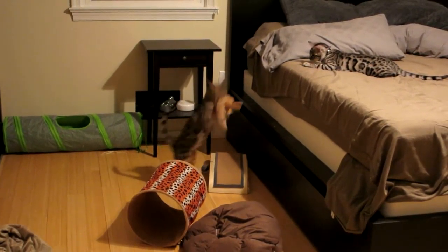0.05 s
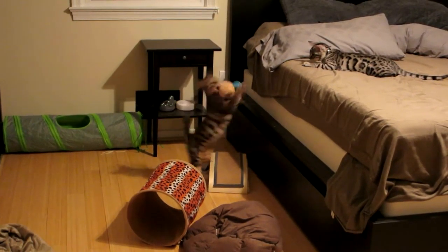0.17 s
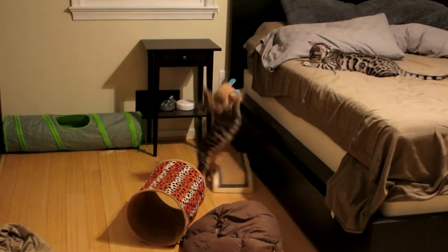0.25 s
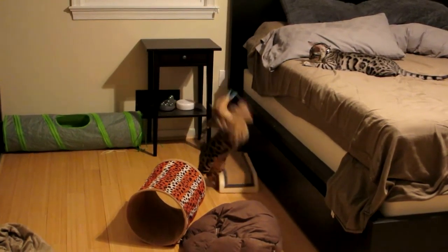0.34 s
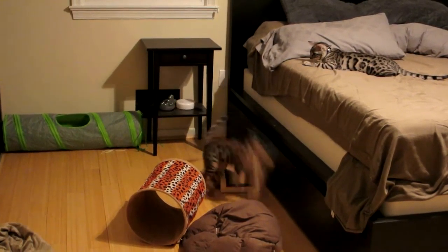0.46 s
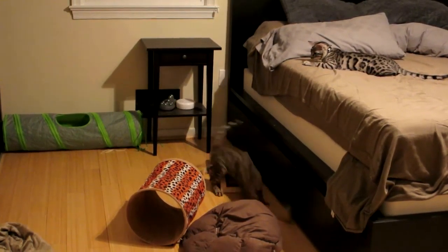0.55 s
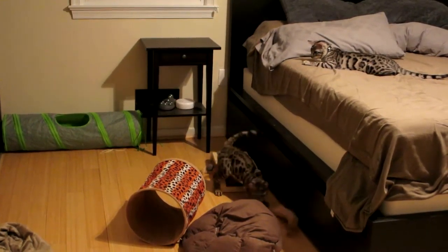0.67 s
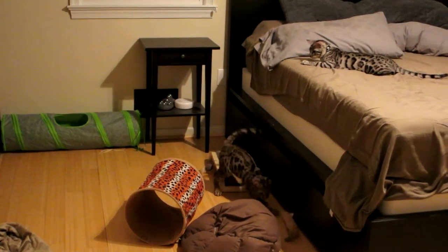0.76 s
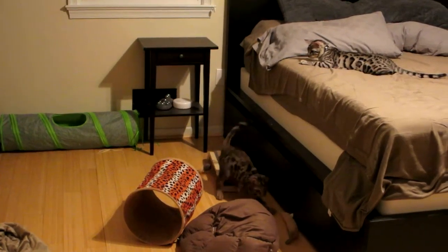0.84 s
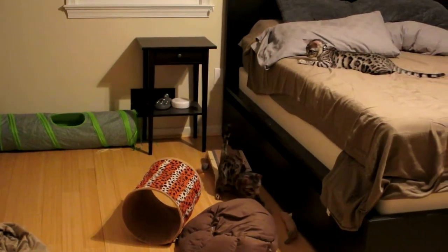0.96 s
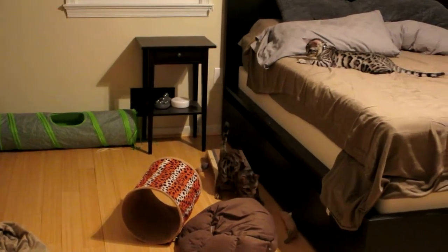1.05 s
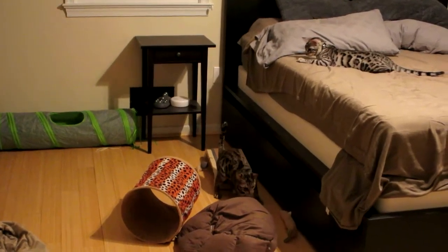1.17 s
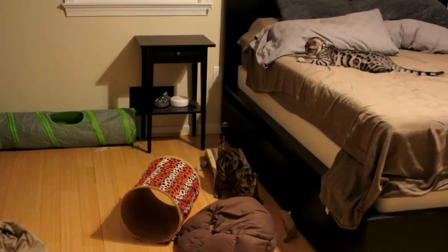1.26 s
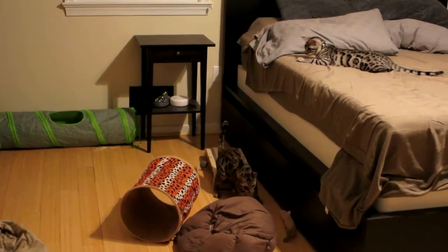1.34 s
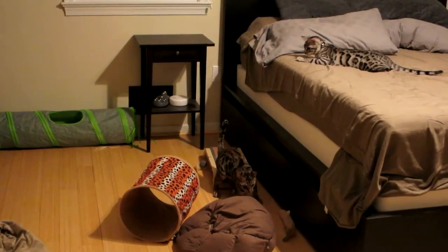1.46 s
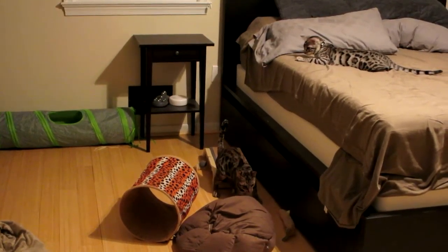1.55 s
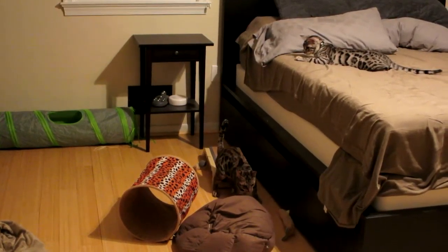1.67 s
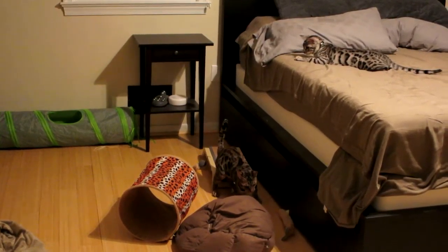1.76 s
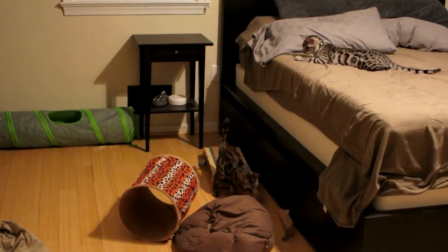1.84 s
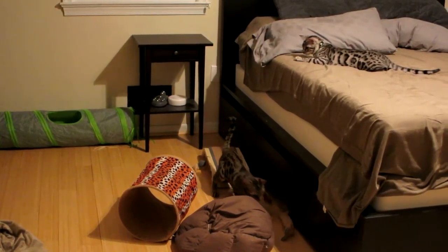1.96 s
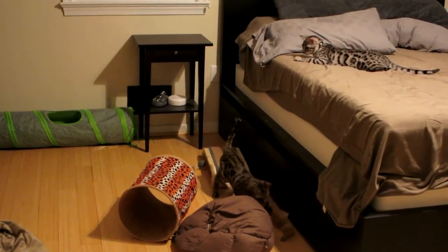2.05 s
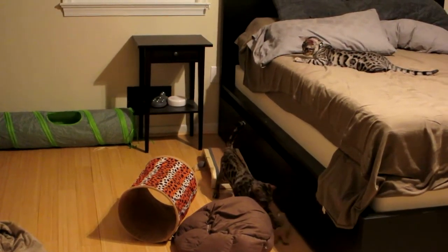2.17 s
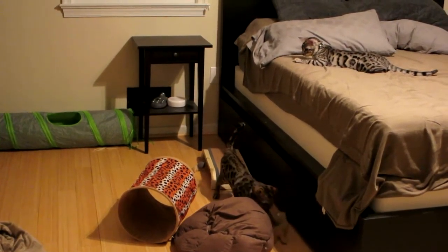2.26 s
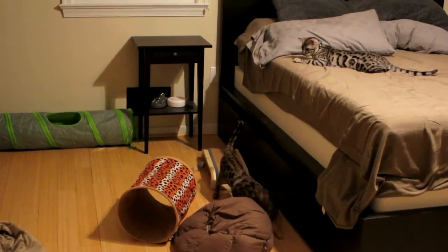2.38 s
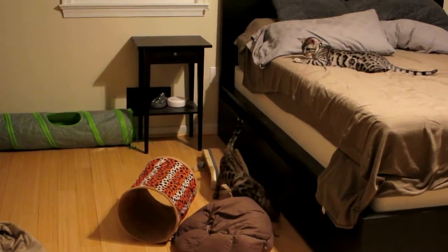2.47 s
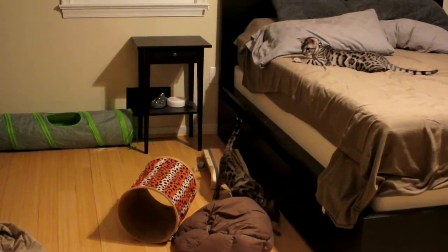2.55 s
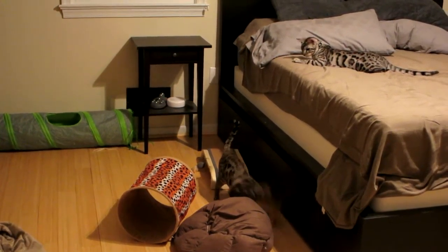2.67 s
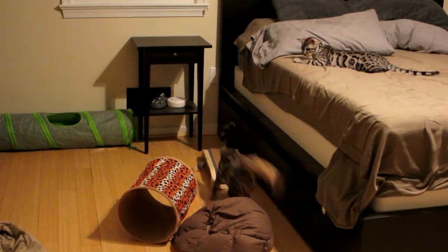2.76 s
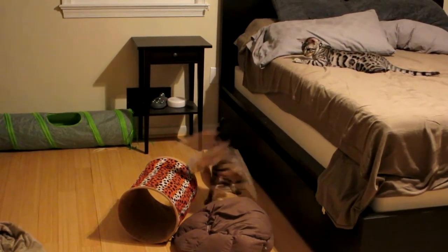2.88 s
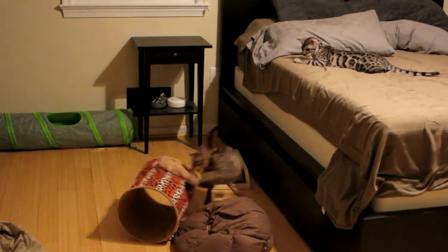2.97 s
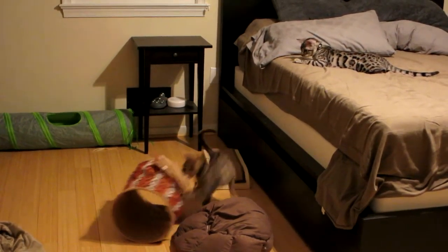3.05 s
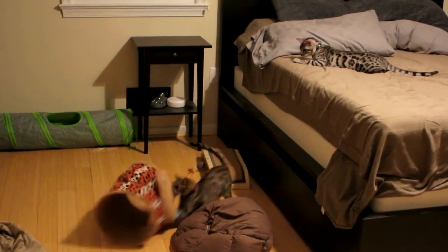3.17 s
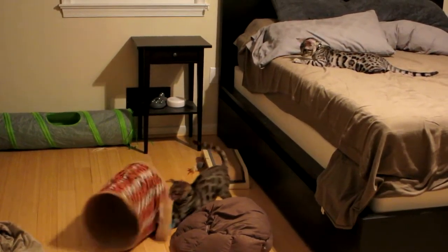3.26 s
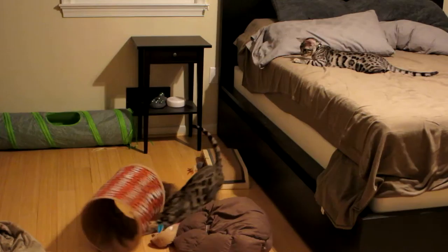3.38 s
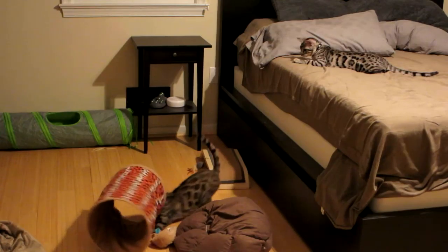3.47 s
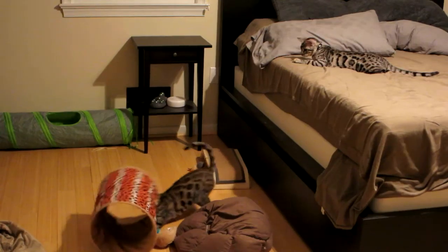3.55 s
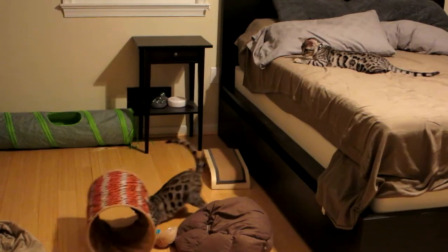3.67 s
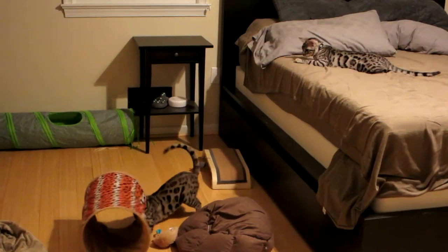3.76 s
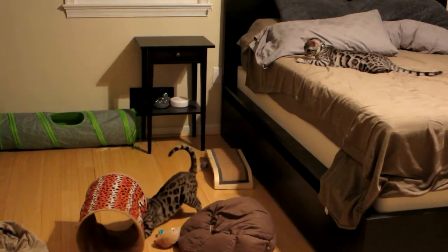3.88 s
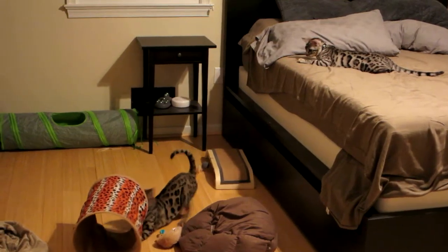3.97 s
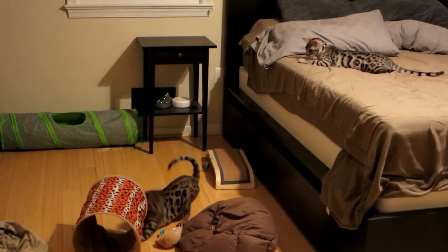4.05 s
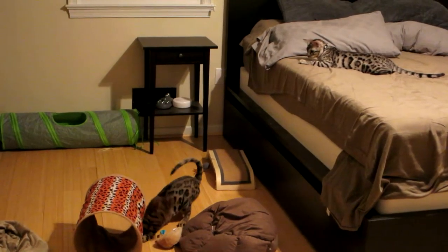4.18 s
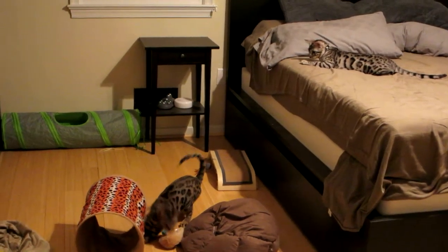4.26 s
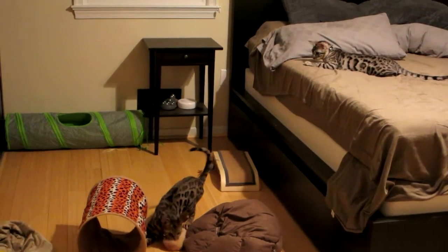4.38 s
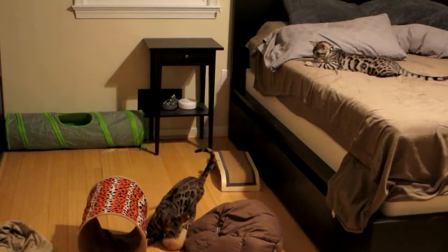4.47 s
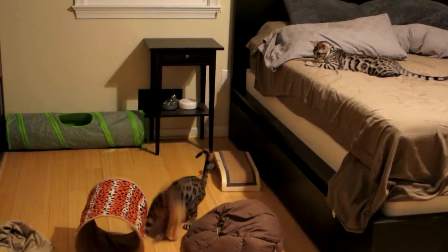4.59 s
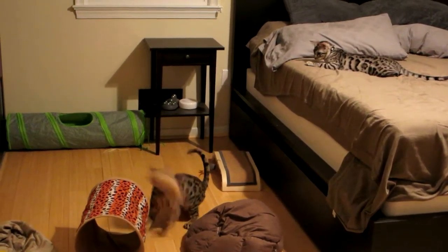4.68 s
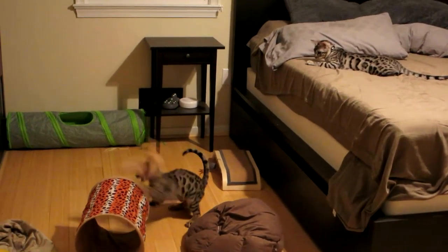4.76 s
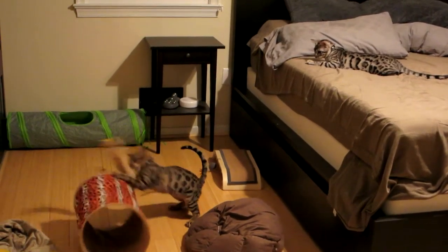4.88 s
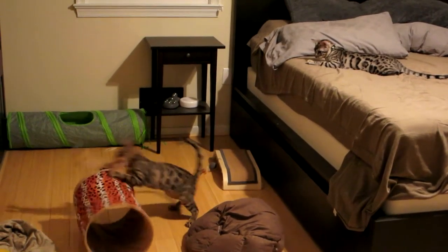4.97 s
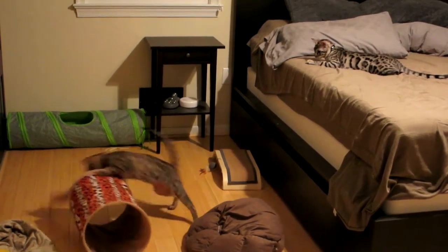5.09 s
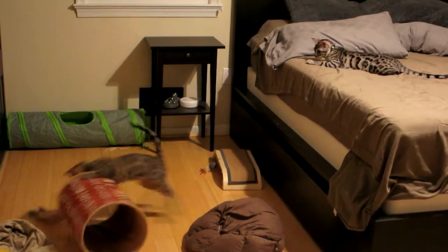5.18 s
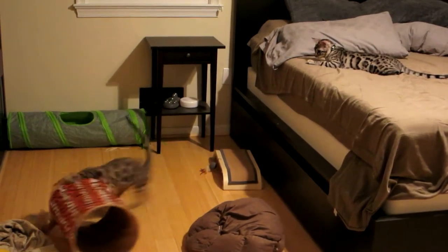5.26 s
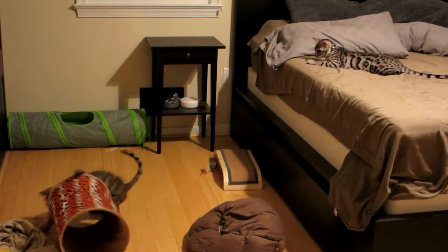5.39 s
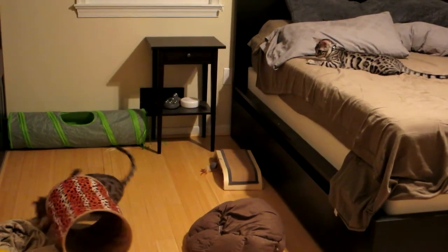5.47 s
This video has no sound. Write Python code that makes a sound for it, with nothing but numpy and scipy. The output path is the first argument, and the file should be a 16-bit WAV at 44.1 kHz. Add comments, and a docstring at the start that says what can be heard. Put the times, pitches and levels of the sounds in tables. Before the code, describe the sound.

Sharp flat wooden claps and a heavy landing, a near-quiet pause, then scuffling fur, ticking claws and padded thuds as a cat plays indoors.

```python
"""Cat chasing a soft toy

A cat chases a soft toy over a hardwood bedroom floor. A scratching board tips and claps down as it leaps off.
Paws thump, claws tick, and fur and fabric scuff as it shoves a play tube about. Blows are filtered clicks and
ringing modes; scuffs are random clicks shaped by strokes. The small room rings briefly over a low rush of
ventilation and a faint whine. An automatic gain ducks at the loud claps and then recovers."""
import sys
import numpy as np
from scipy import signal
from scipy.fft import rfft, irfft, next_fast_len
from scipy.io import wavfile
from scipy.ndimage import uniform_filter1d

SR = 44100
rng = np.random.default_rng(int(sys.argv[2]) if len(sys.argv) > 2 else 0)


def to_wav(s):
    """Save 16-bit WAV."""
    ch = np.atleast_2d(s).T  # columns
    pcm = np.round(np.clip(ch, -1, 1) * 32767)  # PCM
    wavfile.write(sys.argv[1], SR, pcm.astype(np.int16))


N = 243784
RING = 32768  # length of every blow and room response, in samples
TIME = np.arange(N) / SR
AGE = np.arange(RING) / SR  # seconds since a blow


def undb(db):
    """Decibels to gain."""
    return 10 ** (np.asarray(db) / 20)


def along(points, hz):
    """Read (frequency, value) points on a log-frequency axis."""
    f, value = np.transpose(points)
    return np.interp(np.log(np.maximum(hz, 1)), np.log(f), value)


def bins(size):
    """Frequencies of a real spectrum, in Hz."""
    return np.arange(size // 2 + 1) * SR / size


def unit(x):
    """Scale to rms 1."""
    return x / np.sqrt(np.mean(x ** 2))


def paint(x, points):
    """Colour a sound by (frequency, level) points."""
    size = x.shape[-1]
    return irfft(rfft(x) * undb(along(points, bins(size))), size)


def impulse(db):
    """Spectrum of a minimum-phase click: its energy comes as early as the given levels allow."""
    cepstrum = irfft(np.log(undb(db)))
    # Folding the second half onto the first leaves nothing before the click.
    cepstrum[1:RING // 2] *= 2
    cepstrum[RING // 2 + 1:] = 0
    return np.exp(rfft(cepstrum[:RING]))


def hump(hz, steep_db):
    """Causal emphasis around hz that falls by about steep_db an octave on both sides."""
    octaves = np.log2(np.maximum(bins(RING), 10) / hz)
    rounded = np.hypot(octaves, .25) - .25
    return impulse(-steep_db * rounded)


def bands(x):
    """Split a sound into overlapping bands half an octave apart: (centre Hz, band)."""
    size = x.shape[-1]
    spectrum = rfft(x)
    half_octaves = 2 * np.log2(np.maximum(bins(size), 1))
    for k in range(9, 29):
        weight = np.maximum(1 - abs(half_octaves - k), 0)
        yield 2 ** (k / 2), irfft(spectrum * weight, size)


def walk(rate):
    """Smooth random drift through rate new values a second."""
    knots = rng.standard_normal(512)
    return np.interp(TIME * rate, np.arange(len(knots)), knots)


def diffuse(size):
    """Two unrelated white noises."""
    phase = rng.random((2, size // 2 + 1))
    return unit(irfft(np.exp(2j * np.pi * phase), size))


# How wide the microphone pair hears: (frequency [Hz], side minus middle [dB])
STEREO_WIDTH = [(60, -77), (130, -23), (300, -6.5), (700, -8.5), (1400, -6), (3000, -1), (7000, 0),
                (14000, 1.5)]


def pair(x):
    """Two unrelated sounds become left and right: alike in the bass, different in the treble."""
    side = paint(x[1], STEREO_WIDTH)
    return unit(np.array([x[0] + side, x[0] - side]))


# Full lean towards the left microphone; each layer takes a share: (frequency [Hz], left minus right [dB])
LEFT_LEAN = [(60, -4), (110, 2), (200, -7), (380, 9.5), (700, 16), (1300, 9), (4000, 6.5), (8000, 4.5),
             (15000, -3)]


def lean(x, share):
    """Favour the left microphone at most frequencies, the right at a few."""
    db = share * along(LEFT_LEAN, bins(N)) / 2
    return irfft(rfft(x) * undb(np.array([db, -db])), N)


# How long the room rings: (frequency [Hz], time to fall by 60 dB [s])
ROOM_DECAY = [(60, 0.56), (250, 0.43), (600, 0.34), (2500, 0.34), (6000, 0.3), (15000, 0.26)]
# First echoes off the surfaces: (delay [s], gain relative to the direct sound [factor])
FIRST_ECHOES = [(.0036, 0.4), (.010, 0.11), (0.0235, 0.26)]


def room(direct_db, build_s=0.0011):
    """Spectrum of one path across the bedroom: direct sound, first echoes, diffuse tail."""
    tail = 0
    for hz, band in bands(diffuse(RING)):
        decay = np.exp(-np.log(1000) * AGE / along(ROOM_DECAY, hz))
        fading = band * decay * (1 - np.exp(-AGE / build_s))
        tail = tail + fading / fading.std(axis=1, keepdims=True) * band.std()
    tail = pair(tail) * np.minimum(1, 10 * (1 - AGE / AGE[-1]))  # fade out the last tenth
    early = 1 + sum(gain * np.exp(-2j * np.pi * bins(RING) * s) for s, gain in FIRST_ECHOES)
    return rfft(tail) / np.sqrt(RING) + undb(direct_db) * early


def body(colour, modes, ring_db):
    """A struck object's two spectra: a brief clack, and modes that swell before they fade."""
    clack = irfft(impulse(along(colour, bins(RING))))
    ring = 0
    for hz, db, t60 in modes:
        tone = np.sin(2 * np.pi * hz * AGE + rng.uniform(0, 2 * np.pi))
        ring = ring + undb(db) * tone * np.exp(-np.log(1000) * AGE / t60)
    ring = ring * (1 - np.exp(-AGE / 0.002))
    return rfft(unit(clack)), rfft(undb(ring_db) * unit(ring))


def across(thing, path, ring_wet_db=-9):
    """The clack scatters all round the room; the modes arrive mostly straight."""
    clack, ring = thing
    return clack * path + ring * (1 + undb(ring_wet_db) * path)


def add(out, s, spectrum, db):
    """Place a blow at time s; it carries the energy of 50 ms at the given level."""
    blow, start = irfft(spectrum), max(int(s * SR), 0)
    energy = np.sum(blow.mean(axis=0) ** 2)
    blow = blow / np.sqrt(energy / (.05 * SR))
    out[:, start:start + RING] += undb(db) * blow[:, :N - start]


# Colour of the moving air: (frequency [Hz], relative level [dB])
AIR_COLOUR = [(15, -36), (37, -29), (50, -25), (64, -9), (117, -15), (151, -1.5), (189, -14), (237, -7),
              (360, -13), (414, -20.5), (490, -18), (579, -19.5), (1310, -23), (2420, -38), (4300, -49),
              (9000, -55), (14500, -58)]
AIR_DB = -43.5


def ventilation(flicker_db=1.6, flickers_per_s=9):
    """A low, even rush of air: coloured noise whose bands flutter a little."""
    noise = paint(pair(diffuse(next_fast_len(N, True))), AIR_COLOUR)
    air = 0
    for _, band in bands(noise):
        air = air + band[:, :N] * undb(flicker_db * walk(flickers_per_s))
    return lean(unit(air) * undb(AIR_DB), share=0.39)


WHINE_HZ, WHINE_DB = 15735, -80


def whine():
    """A faint, steady electronic whistle near the top of hearing: one sine wave."""
    return np.sqrt(2) * undb(WHINE_DB) * np.sin(2 * np.pi * WHINE_HZ * TIME)


# Colour of one claw click: (frequency [Hz], relative level [dB])
CLAW_COLOUR = [(300, -52), (1500, 9.5), (2600, 9), (4500, -2), (7000, -5), (12000, -5), (16000, -7)]
# Claws tick on the wood; a higher emphasis is a brighter tick:
# (time [s], level among the ticks [dB], frequency emphasised [Hz])
CLAW_TICKS = [(0.0887, -38.5, 7100), (0.552, -38, 8000), (0.781, -44.5, 4630), (2.082, -42, 5970),
              (2.279, -45, 6900), (2.538, -48, 7140), (2.561, -41.5, 5570), (2.701, -41, 8000),
              (2.738, -36.5, 6040), (2.853, -45.5, 5060), (2.969, -34.5, 4100), (3.241, -29.5, 6500),
              (3.494, -36, 8450), (3.552, -33, 5500), (3.795, -34, 7260), (3.927, -46.5, 7000),
              (4.056, -30.5, 4860), (4.488, -37.5, 4360), (4.822, -32.5, 8400), (4.935, -33, 4830),
              (5.093, -34.5, 4000)]


def claw_ticks(trim_db=-16):
    """Each claw gives one tiny click that the room draws out."""
    out, paths = np.zeros((2, N)), [room(direct_db=-8.0) for _ in range(3)]
    claw = impulse(along(CLAW_COLOUR, bins(RING)))
    for k, (s, db, hz) in enumerate(CLAW_TICKS):
        click = claw * hump(hz, steep_db=6.0)
        add(out, s, click * paths[k % len(paths)], db + trim_db)
    return lean(out, share=0.37)


STROKE_DEPTH_DB = 17  # a stroke's two ends lie this far under its peak
SWELL_SHARE = 0.54  # share of its length before the peak


def stroke(peak_s, db, length_s):
    """Pressure of one stroke: it swells to its peak and eases off, evenly in decibels."""
    progress = (TIME - peak_s) / length_s
    distance = np.maximum(-progress / SWELL_SHARE, progress / (1 - SWELL_SHARE))
    return undb(db - STROKE_DEPTH_DB * distance)


def friction(strokes, colour, slips_per_s, scatter_db, jerk_db, count=3):
    """Fibres catch and slip: clicks of uneven size, in jerks, along several paths in the room."""
    pressure = sum(stroke(s, db, length_s) for s, db, length_s in strokes)
    pressure = pressure * undb(jerk_db * walk(60))
    size, out = next_fast_len(N, True), 0
    for _ in range(count):
        spread = np.minimum(rng.exponential(size=size), 4)
        sizes = rng.choice([-1, 1], size) * undb(scatter_db * spread)
        happens = rng.random(size) < slips_per_s / count / SR
        slips = unit(paint(happens * sizes, colour))[:N]
        path = irfft(room(direct_db=-4.5))
        out = out + signal.fftconvolve((slips * pressure)[None], path, axes=1)[:, :N]
    return out / np.sqrt(count)


# Colours of fur on wood and of fabric: (frequency [Hz], relative level [dB])
FUR_COLOUR = [(60, -15), (300, 10), (1500, 1.5), (3000, 1), (6000, -3), (9000, -6), (12500, -6.5),
              (16000, -16)]
FABRIC_COLOUR = [(150, 4), (450, -16), (850, 7.5), (1400, 4.5), (2300, 5), (3500, -2.5), (6000, -5.5),
                 (15000, -20)]
# Fur and pads slide over the floor: (peak time [s], level among the slides [dB], length [s])
FUR_SLIDES = [(0.005, -47.5, 0.083), (0.09, -51, 0.28), (0.28, -64, 0.079), (0.38, -44, 0.11),
              (0.568, -33.5, 0.08), (0.67, -54.5, 0.35), (2.088, -52, 0.13), (2.645, -49, 0.081),
              (2.75, -57, .12), (3.01, -49.5, 0.41), (3.145, -40.5, 0.18), (3.328, -32, 0.14),
              (3.5, -49.5, 0.18), (3.66, -64, 0.066), (4.0, -60.5, 0.48), (4.112, -56, 0.027),
              (4.24, -62, 0.22), (4.68, -54.5, 0.63), (4.823, -45, 0.058), (4.955, -43.5, .11),
              (5.18, -50.5, 0.41), (5.46, -56.5, 0.66)]
# Claws and toy rasp on the scratching board, then on the fabric tube:
# (peak time [s], level among the rubs [dB], length [s])
FABRIC_RUBS = [(0.277, -26.5, 0.052), (3.068, -34.5, 0.15), (3.138, -37, 0.067), (3.25, -48, .18),
               (3.328, -25, 0.098), (3.65, -46, .18), (4.825, -42.5, .06), (4.975, -49, .14),
               (5.105, -44.5, 0.093), (5.2, -57.5, 0.33), (5.38, -49, 0.64)]


def scuffles():
    """Fur hisses over the boards; board and tube fabric rasp in sparser catches."""
    fur = friction(FUR_SLIDES, FUR_COLOUR, slips_per_s=1100, scatter_db=4.0, jerk_db=1.5)
    fabric = friction(FABRIC_RUBS, FABRIC_COLOUR, slips_per_s=600, scatter_db=3.5, jerk_db=2.5)
    return lean(undb(0.5) * fur + undb(-3.0) * fabric, share=0.45)


# Broad colour of the floorboards: (frequency [Hz], relative level [dB])
FLOOR_COLOUR = [(25, -25), (65, -13.5), (95, -7.5), (145, -1), (200, -3.5), (290, -3.5), (400, -3.5),
                (550, -20), (1000, -34), (4000, -58.5)]
# Notes that floor and room ring at together:
# (frequency [Hz], relative level [dB], time to fall by 60 dB [s])
FLOOR_NOTES = [(65, -15, 0.47), (145.8, -3, 0.29), (202.2, -2, 0.32), (259.4, -10, 0.57), (296, 2, 0.24)]


def floorboards():
    """The struck floor: a dull clack and a few low modes."""
    return body(FLOOR_COLOUR, FLOOR_NOTES, ring_db=-4.5)


BOOM_HZ, BOOM_LAG_S = 61.5, 0.01115  # the joists answer a moment after the boards
# Paws, toy and tube land:
# (time [s], level among the thumps [dB], pitch of the thud [Hz], joist boom relative to the thud [dB])
LANDINGS = [(0.537, -17.5, 220, -35), (0.554, -17.5, 204, -10.5), (0.593, -23, 206, -31),
            (1.619, -42, 226, -17), (2.069, -36, 138, -26), (2.47, -36, 161, -22), (2.655, -34, 126, 3),
            (2.853, -36, 210, 1.5), (3.13, -47, 213, 13), (3.142, -37, 111, -29), (3.303, -20, 260, -12),
            (3.64, -35.5, 128, 2.5), (4.68, -35.5, 125, -24), (4.808, -21, 288, -12),
            (4.996, -24, 149, -17), (5.09, -29.5, 153, -33), (5.317, -16.5, 135, -8),
            (5.385, -38.5, 190, 16.5)]


def paw_thumps(floor, trim_db=-9):
    """Padded landings push the floorboards slowly, so mostly low notes answer; the joists boom just after."""
    out, paths = np.zeros((2, N)), [room(direct_db=-8) for _ in range(4)]
    joists = hump(BOOM_HZ, steep_db=15)
    for k, (s, db, hz, boom_db) in enumerate(LANDINGS):
        boards = across(floor, paths[k % len(paths)])
        add(out, s, boards * hump(hz, steep_db=11), db + trim_db)
        add(out, s + BOOM_LAG_S, boards * joists, db + boom_db + trim_db)
    return lean(out, share=0.12)


# Hard edges clack on the boards: (time [s], level [dB], pitch [Hz])
EDGE_CLACKS = [(0.281, -22.5, 3230), (0.284, -22.5, 2600), (0.528, -28.5, 1900), (0.568, -37, 2740),
               (0.898, -21, 2800), (2.457, -59, 2520), (2.738, -62, 2460), (3.325, -39, 2320),
               (3.552, -51.5, 2450), (4.056, -54, 2630), (4.058, -54, 4240), (4.488, -61, 2160),
               (4.676, -57, 2900)]


def edge_clacks(focus_db=36):
    """A hard edge snaps against the wood and rings for an instant around one pitch."""
    out, paths = np.zeros((2, N)), [room(direct_db=-6) for _ in range(3)]
    for k, (s, db, hz) in enumerate(EDGE_CLACKS):
        add(out, s, hump(hz, steep_db=focus_db) * paths[k % len(paths)], db)
    return lean(out, share=0.54)


# Broad colour of wood struck on wood: (frequency [Hz], relative level [dB])
BOARD_COLOUR = [(60, -31), (180, -7), (280, -5.5), (450, 1), (600, 0), (1000, -4), (1300, -5.5), (1750, -7),
                (2600, -6), (3600, -41.5), (4400, -24), (5400, -25.5), (9000, -36), (15000, -49)]
# Notes that board and room ring at together:
# (frequency [Hz], relative level [dB], time to fall by 60 dB [s])
BOARD_NOTES = [(265, -1, .45), (300, -2, .2), (321, -2, .2), (386, -4, .25), (410, -1, .25), (429, 0, .25),
               (484, -5, .3), (564, 3.5, .4), (636, -2, .35), (676, -4, .3), (743, -3, .25), (827, -3, .25),
               (906, -6, .25), (1062, -7, .3), (1150, -5, .32), (1315, -4, .28), (1830, -10, .3),
               (2099, -8, .32), (2610, -6, .28)]
# Board and tube knock on the floor; the rows at 0.9025 and 0.919 are echoes of the clap at 0.898.
# A higher corner sounds harder: (time [s], level [dB], corner [Hz], floor thud relative to that level [dB])
BOARD_KNOCKS = [(0.235, -37, 400, 4), (0.253, -35, 606, -27), (0.267, -26.5, 1400, -16),
                (0.279, -10.5, 1220, -5.5), (0.282, -3, 1610, -13), (0.295, -35, 900, -17),
                (0.307, -24, 800, -1), (0.529, -23, 1150, 2.5), (0.568, -37.5, 3040, -12),
                (0.898, -8.5, 3300, -31.5), (0.9025, -26.5, 2960, 9), (0.919, -18.5, 3400, -42),
                (2.969, -39, 1020, -2), (3.128, -35, 1510, 4), (4.818, -44.5, 1000, 7.5),
                (4.981, -35.5, 1750, 1), (5.314, -39, 615, 3.5), (5.364, -44, 1290, -13),
                (5.372, -37.5, 676, 0)]


def board_knocks(floor):
    """Board and tube clap on the wood, with echoes; soft contacts lose treble, and the floor thuds under each."""
    out, board = np.zeros((2, N)), body(BOARD_COLOUR, BOARD_NOTES, ring_db=-7.0)
    paths = [room(direct_db=-9.5) for _ in range(5)]  # the rows take these in turn
    for k, (s, db, corner_hz, thud_db) in enumerate(BOARD_KNOCKS):
        path = paths[k % len(paths)]
        softness = (1 + 1j * bins(RING) / corner_hz) ** 2
        add(out, s, across(board, path) / softness, db)
        add(out, s, across(floor, path), db + thud_db)
    return lean(out, share=0.42)


def scene():
    """Everything in the bedroom, left and right."""
    background = ventilation() + whine()
    floor = floorboards()
    play = claw_ticks() + scuffles() + paw_thumps(floor) + edge_clacks() + board_knocks(floor)
    return background + play


TOP_HZ = 15950


def record(dry, threshold_db=-17, recover_db_per_s=24.0):
    """An automatic gain turns down on loud claps and recovers steadily; a steep filter cuts the top."""
    power = uniform_filter1d(np.mean(dry ** 2, axis=0), size=600)
    loud_db = 10 * np.log10(np.maximum(power, 1e-12))
    release = recover_db_per_s * TIME
    wanted_db = 0.8 * np.maximum(loud_db - threshold_db, 0)
    # The running maximum holds the deepest cut, less the recovery since then.
    duck_db = np.maximum.accumulate(wanted_db + release) - release
    wet = np.clip(dry * undb(-duck_db), -1, 1)
    top_cut = signal.ellip(10, .2, 70, TOP_HZ, fs=SR, output="sos")
    return signal.sosfilt(top_cut, wet)


dry = scene()
out = record(dry)
to_wav(out)
```